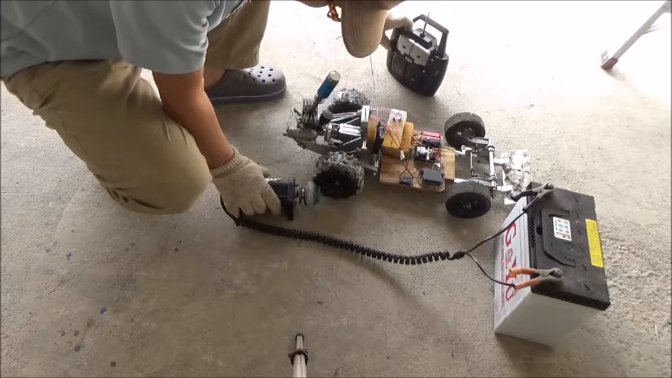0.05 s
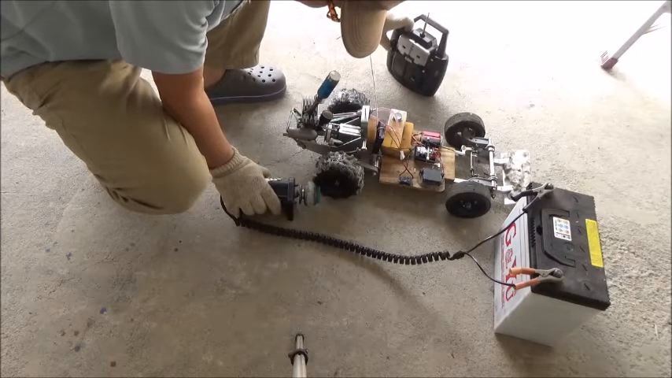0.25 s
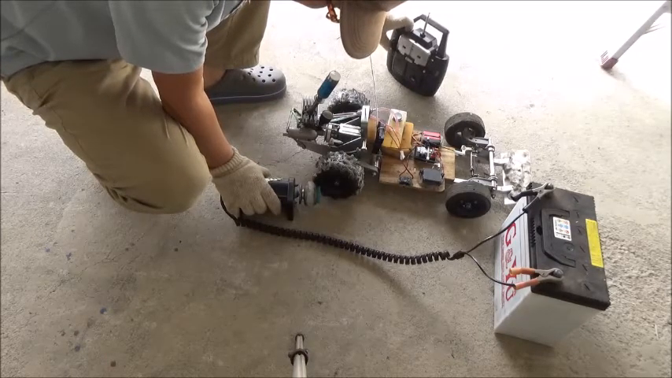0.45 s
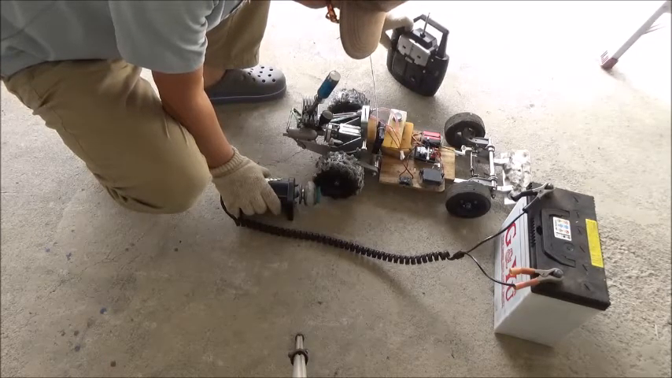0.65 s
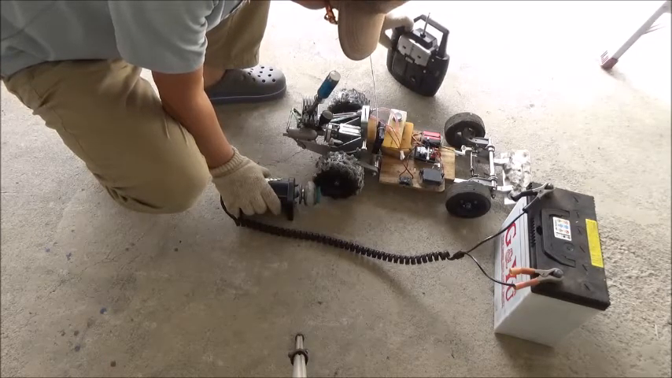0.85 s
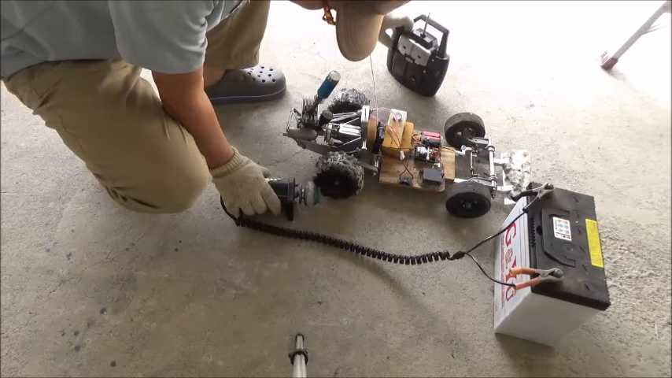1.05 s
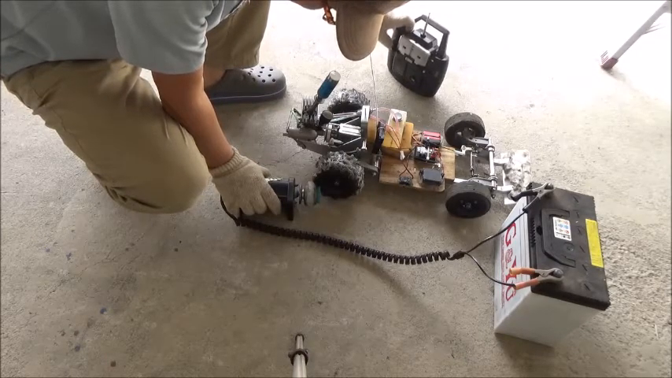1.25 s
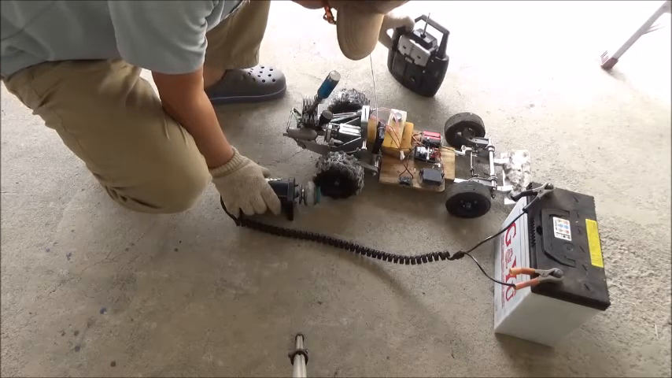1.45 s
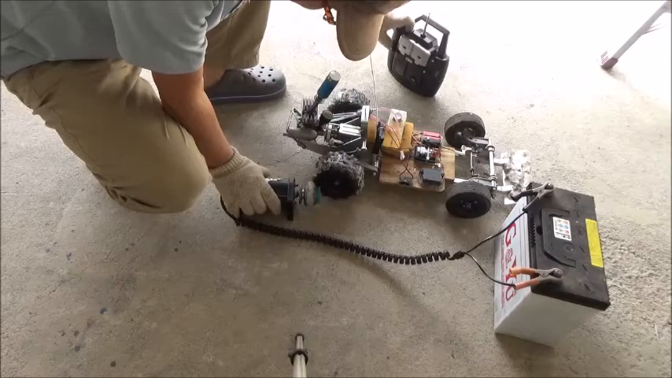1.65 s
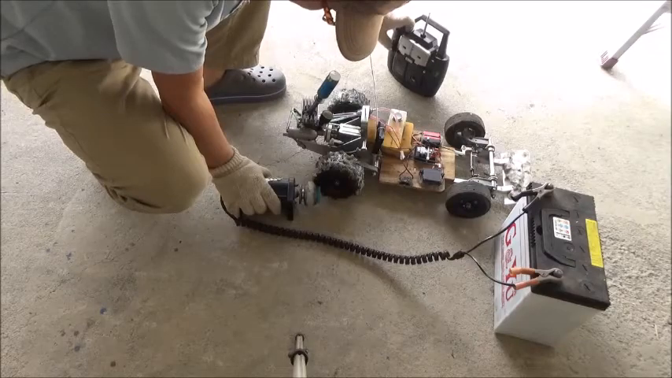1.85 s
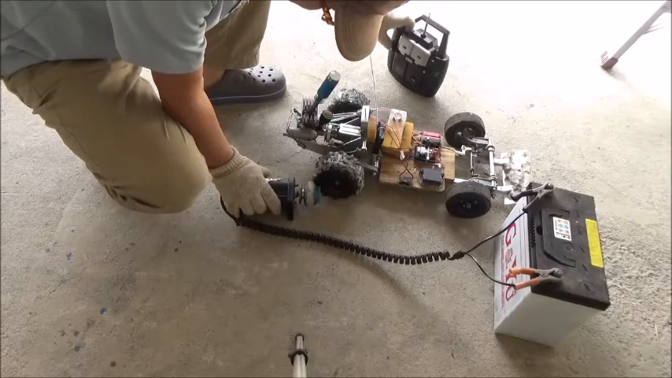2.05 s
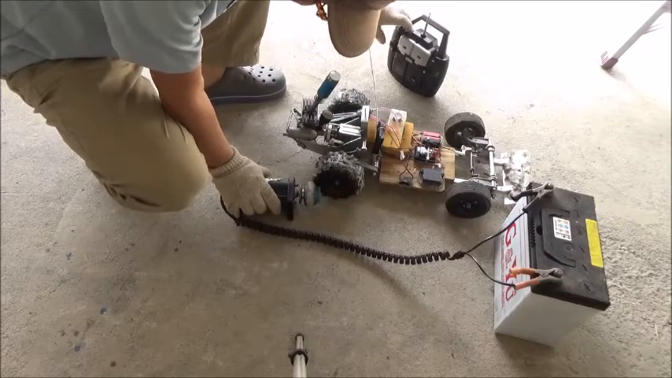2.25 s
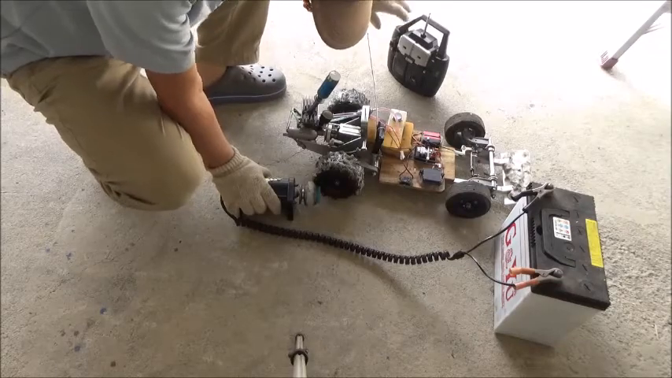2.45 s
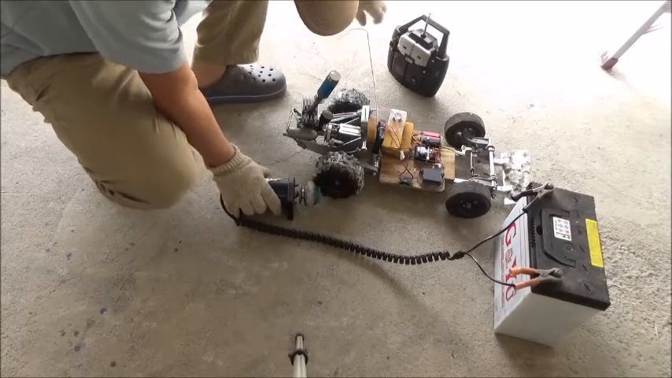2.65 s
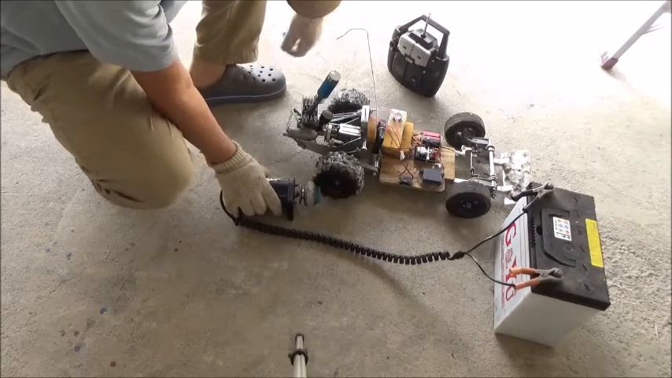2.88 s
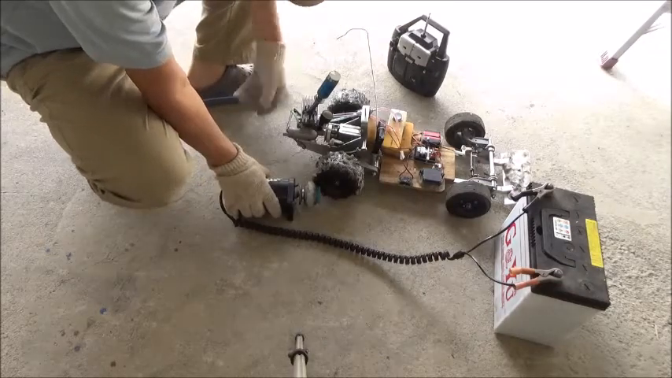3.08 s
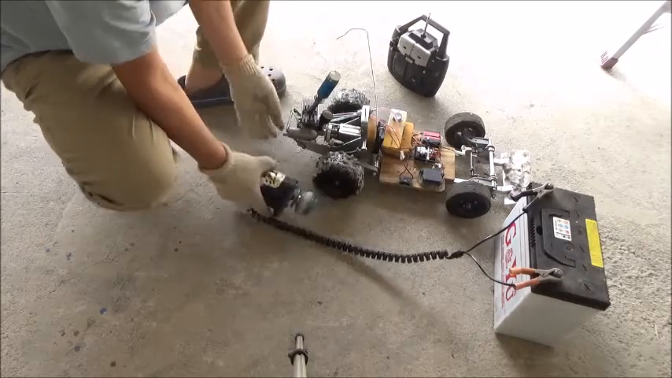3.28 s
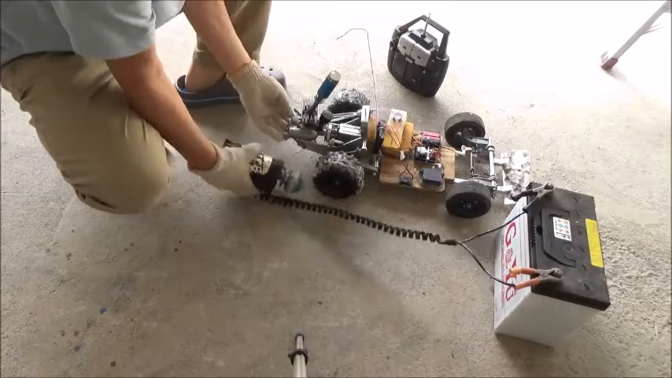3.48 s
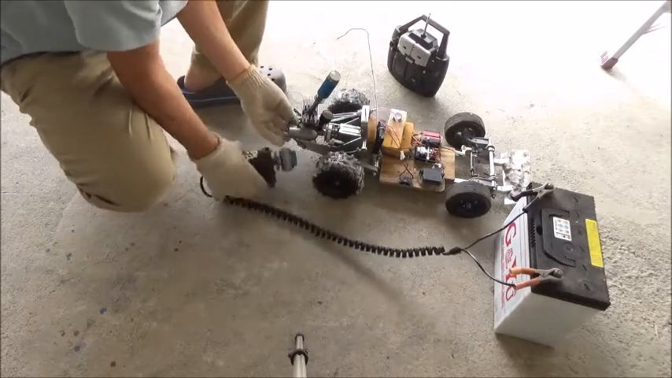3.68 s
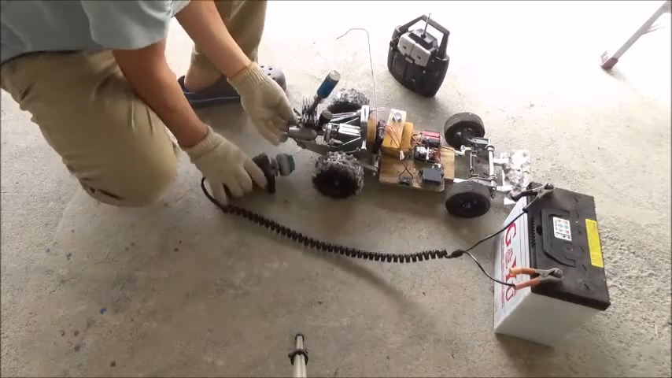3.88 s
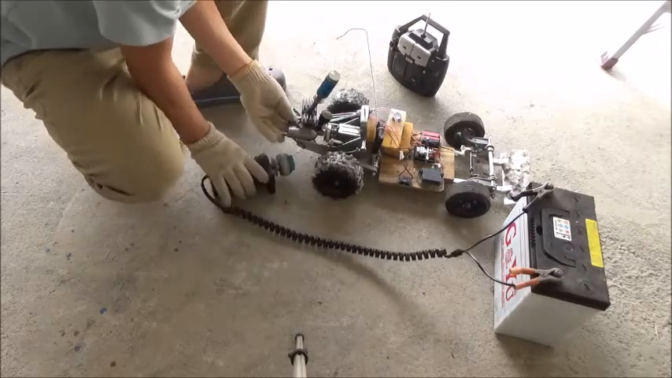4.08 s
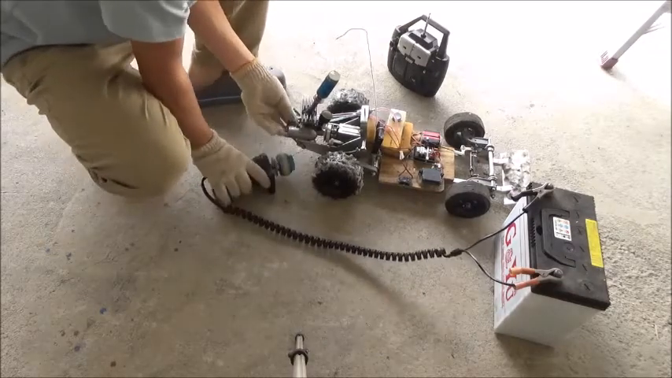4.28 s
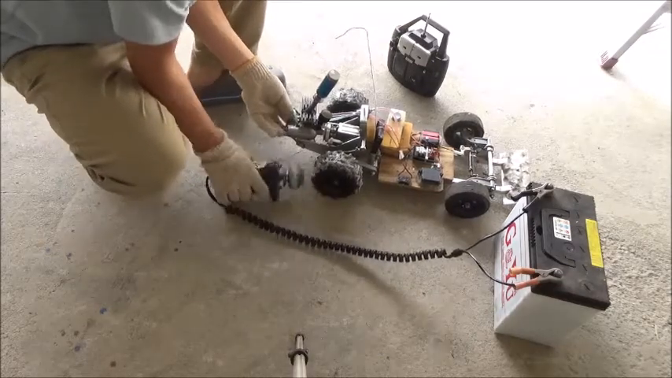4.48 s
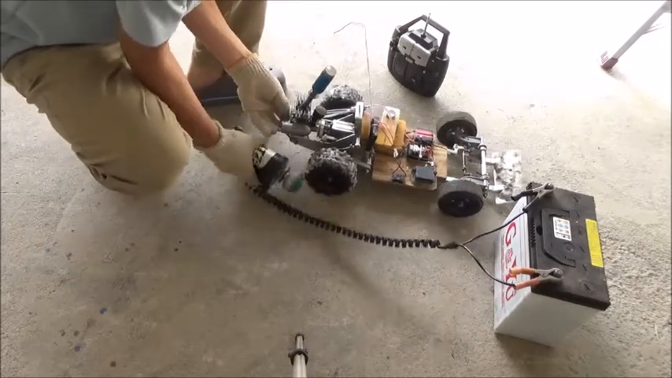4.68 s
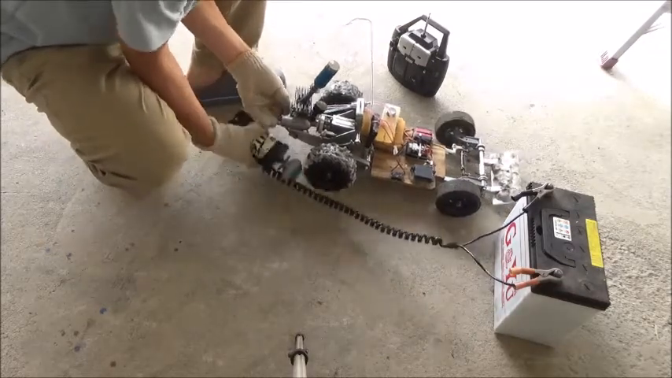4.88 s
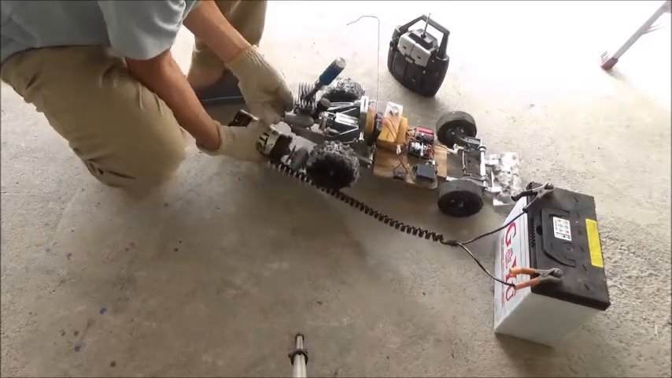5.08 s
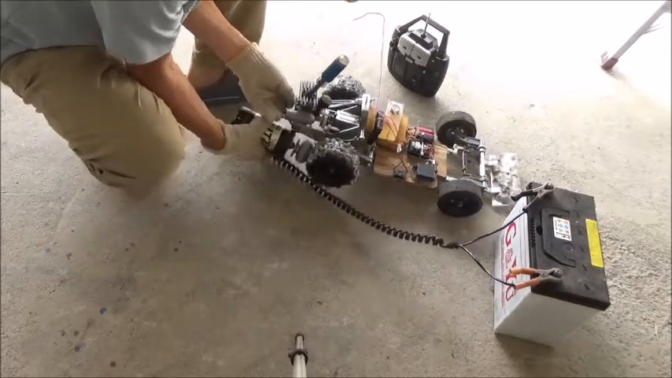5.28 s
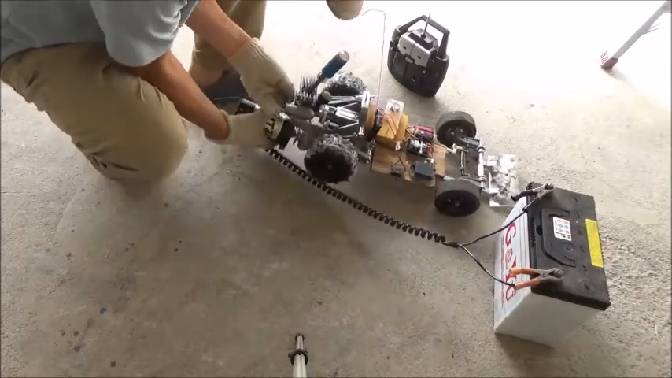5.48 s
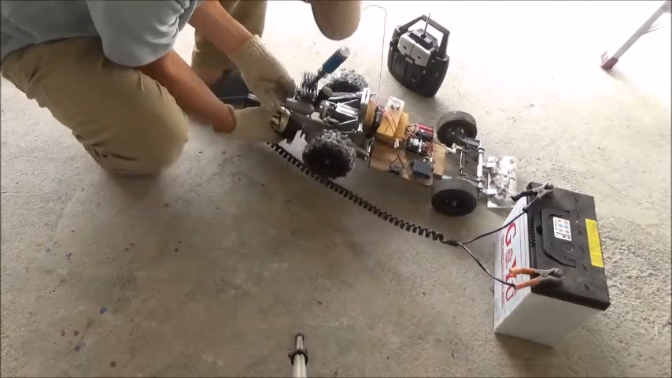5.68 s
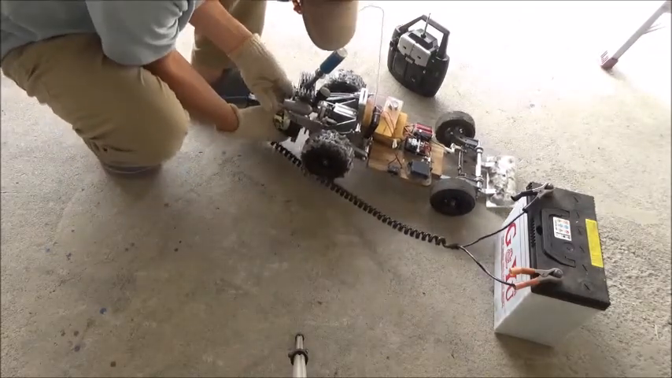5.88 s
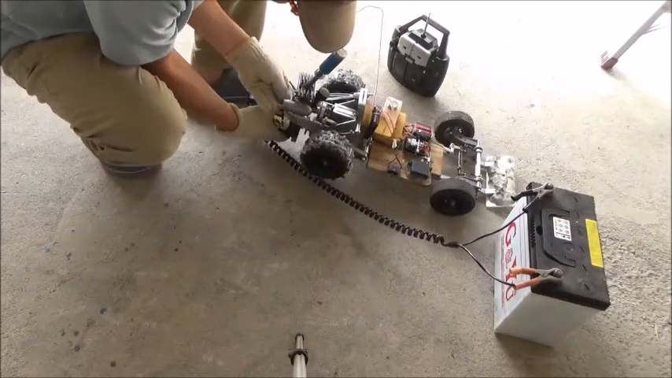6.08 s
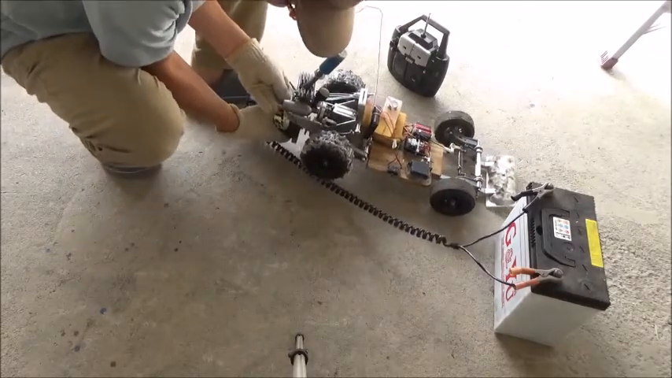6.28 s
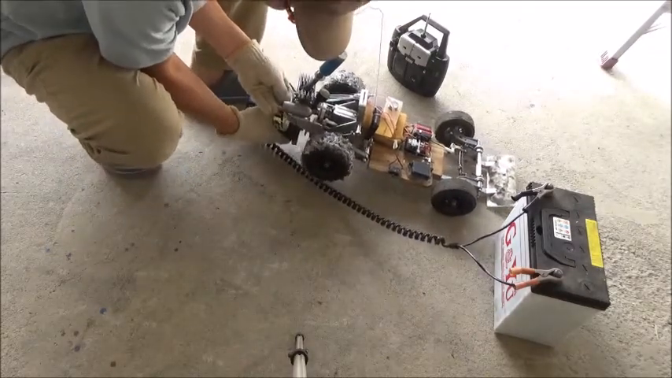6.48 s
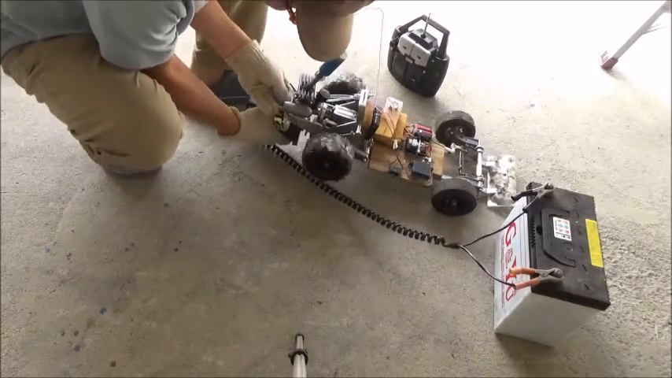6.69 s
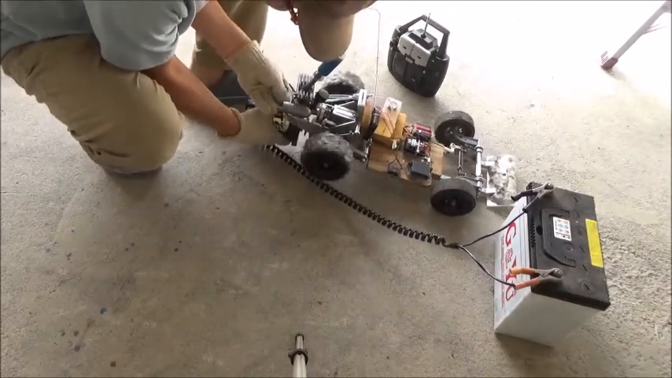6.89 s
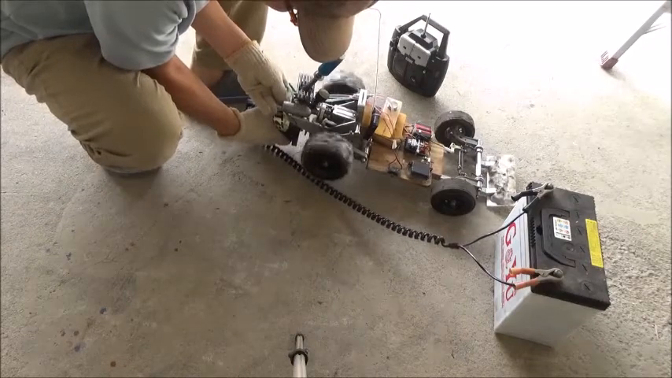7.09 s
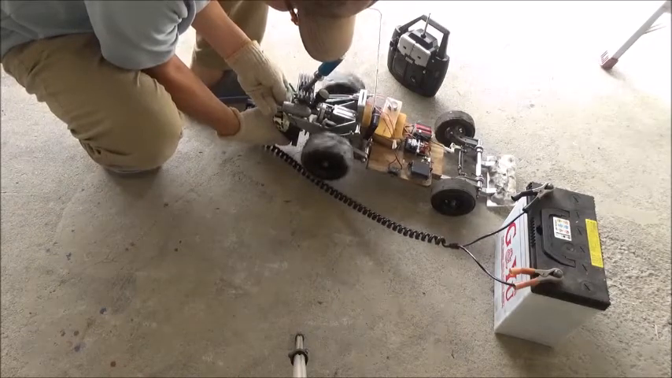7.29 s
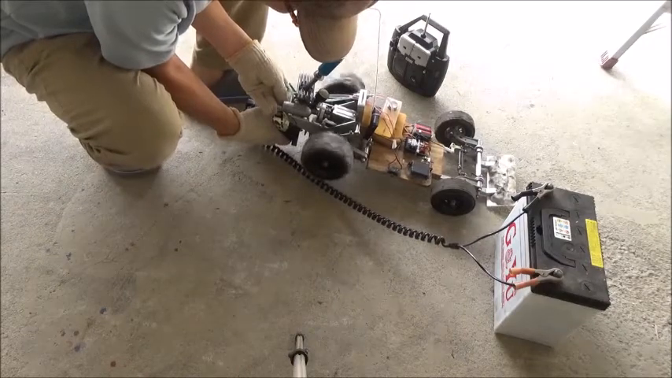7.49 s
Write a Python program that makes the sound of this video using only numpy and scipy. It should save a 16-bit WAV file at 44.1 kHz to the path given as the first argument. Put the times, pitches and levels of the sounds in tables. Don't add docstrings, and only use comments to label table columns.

```python
import sys
import numpy as np
from scipy import signal
from scipy.fft import rfft, irfft
from scipy.io import wavfile
from scipy.ndimage import uniform_filter1d

SR = 44100
rng = np.random.default_rng(int(sys.argv[2]) if len(sys.argv) > 2 else 0)


def elevation(decibels):
    levels = np.asarray(decibels, float)
    return 10 ** (levels / 20)


def wrap_up_sound(samples):
    columns = np.atleast_2d(samples).T
    tamed = np.clip(columns, -1, 1)
    steps = np.round(tamed * 32767).astype(np.int16)
    wavfile.write(sys.argv[1], SR, steps)


N = 332514


def evened(x):
    return x / np.sqrt(np.mean(x ** 2) + 1e-20)


def read(points, hz):
    f, value = np.transpose(points)
    return np.interp(np.log(hz + 1), np.log(f + 1), value)


def add(mix, start_s, sound):
    part = mix[round(start_s * SR):][:len(sound)]
    part += sound[:len(part)]


def resonate(x, hz, width_hz):
    turn = np.exp(2j * np.pi * np.cumsum(hz * np.ones(len(x))) / SR)
    r = np.exp(-np.pi * width_hz / SR)
    return 2 * (turn * signal.lfilter([1 - r], [1, -r], x / turn + 1e-18)).real


def resonate_twice(x, hz, width_hz, ratio):
    return resonate(resonate(x, hz, width_hz), hz, ratio * width_hz)


def coloured(x, points):
    size = x.shape[-1]
    return irfft(rfft(x) * elevation(read(points, np.fft.rfftfreq(size, 1 / SR))), size)


def thinned(x, hz):
    return signal.sosfilt(signal.butter(3, hz, "high", fs=SR, output="sos"), x)


def drift(size, hz):
    low_pass = signal.butter(2, hz, fs=SR, output="sos")
    return evened(signal.sosfiltfilt(low_pass, rng.standard_normal(size)))


def grit(size, per_s, spread_db):
    sizes = elevation(spread_db * np.minimum(rng.exponential(1, size), 3))
    return evened(rng.standard_normal(size) * (rng.random(size) < per_s / SR) * sizes)


# centre in Hz, width in Hz, level in dB.
FAN_HUM = [(117.6, 15, -84.5), (244, 12.5, -74.5)]


def fan():
    return sum(elevation(db) * evened(resonate_twice(rng.standard_normal(N), hz, width_hz, 2))
               for hz, width_hz, db in FAN_HUM)


# frequency in Hz, density in dB per Hz.
CHORUS_SPECTRUM = [(15, -64), (25, -31), (188, -16.5), (248, -5.5), (373, -8.5), (482, -3), (782, -1.5),
                   (1150, -9.5), (2010, 2), (3180, -2.5), (3710, 1.5), (4910, 1.5), (6840, 2.5), (9770, -4),
                   (11100, -9), (14400, -43), (22000, -120)]
# frequency in Hz, correlation (-1 to 1).
CHORUS_LIKENESS = [(25, 0.99), (170, 0.92), (490, 0.73), (1400, 0.68), (4010, 0.77), (11500, 0.74)]
# centre in seconds, half length in seconds, change in dB.
INSECT_LULLS = [
    (0.05, 0.55, -2.5),
    (1.58, 0.25, -2),
    (2.85, 0.17, -2),
    (6.014, 0.038, -3.5),
]


def chorus():
    frames, hz = N // 256 + 5, np.fft.rfftfreq(1024, 1 / SR)
    a, b, c, d, patches = rng.standard_normal((frames, 513, 5)).T
    patches = evened(uniform_filter1d(uniform_filter1d(patches, 10, 0), 14, 1))
    same = np.clip(read(CHORUS_LIKENESS, hz), -1, 1)[:, None]
    left = a + 1j * b
    right = same * left + np.sqrt(1 - same ** 2) * (c + 1j * d)
    z = np.array([left, right])
    z *= elevation(read(CHORUS_SPECTRUM, hz)[:, None] + 2.36 * patches)
    frame_s = np.arange(frames) * 256 / SR
    lull_db = sum(db * np.exp(-((frame_s - s) / half_s) ** 2) for s, half_s, db in INSECT_LULLS)
    z *= elevation(np.outer(np.clip(hz / 2500, 0, 1), lull_db))
    air = signal.istft(z, nperseg=1024, noverlap=768)[1][:, :N]
    return elevation(-44.5) * elevation(0.3 * drift(N, 0.87)) * evened(air)


# start in seconds, end in seconds, level in dB.
BUZZES = [
    (2.273, 2.598, -45.5),
    (3.359, 3.701, -44),
    (4.446, 4.801, -45.5),
    (5.556, 5.915, -45),
]
# resonance in Hz, width in Hz, level in dB.
ABDOMEN_MODES = [(3500, 38, 0.5), (4510, 41, 0.5), (5250, 120, 1), (5710, 90, 2.5), (6260, 33, -23),
                 (6500, 55, 0)]


def buzz():
    out = np.zeros(N)
    spectrum = [(2000, -31), (3500, 1.5), (5500, -9), (7200, 6.0), (7800, -28), (11000, -40)]  # Hz, dB
    for start_s, end_s, db in BUZZES:
        clicks = grit(round((end_s - start_s) * SR), 4000, 0.73)
        wide = coloured(clicks, spectrum)
        bands = sum(elevation(d) * resonate(clicks, hz, max(width_hz, 120)) for hz, width_hz, d in ABDOMEN_MODES)
        body = evened(evened(wide) + 1.5 * evened(bands))
        add(out, start_s, elevation(db) * body * signal.windows.tukey(len(clicks), .35))
    return out


# start in seconds, length in seconds, top in Hz, level in dB.
CHIRPS = [(0.084, .05, 2010, -58), (0.182, 0.034, 2220, -51.5), (0.342, 0.13, 1660, -52),
          (0.441, .12, 2540, -47.5), (0.642, 0.065, 2540, -54), (0.708, 0.18, 2360, -51.5),
          (1.211, 0.11, 2600, -48.5), (1.662, 0.046, 1790, -56), (1.77, 0.038, 2600, -53),
          (1.865, 0.052, 2740, -53.5), (1.961, 0.028, 2440, -49), (2.029, 0.088, 2680, -47.5),
          (2.885, 0.054, 2384, -54), (2.967, 0.067, 2330, -55), (3.059, .04, 2520, -50),
          (3.203, 0.17, 2165, -50.5), (4.101, 0.11, 1920, -50), (4.738, 0.061, 3580, -47),
          (4.798, 0.11, 2610, -52), (5.053, 0.058, 2270, -60), (5.221, 0.083, 2420, -51)]
# start in seconds, length in seconds, pitch in Hz, level in dB.
HELD_NOTES = [(.37, 0.12, 2880, -53), (.42, 0.1, 3500, -51), (0.562, 0.65, 3570, -51),
              (0.855, 0.35, 1805, -53.5), (1.348, 0.13, 3660, -49), (1.982, 0.066, 1650, -53),
              (2.106, 0.141, 3500, -46), (2.401, 0.23, 1984, -52), (3.028, 0.11, 1325, -57),
              (3.155, 0.165, 3645, -45), (3.933, 0.313, 1920, -50), (4.114, 0.091, 3500, -48.5),
              (4.227, 0.24, 3694, -46), (5.032, 0.42, 3630, -53), (5.327, 0.26, 3626, -48.5),
              (5.381, 0.41, 1890, -51)]
# start in seconds, length in seconds, first pitch in Hz, level in dB.
FALLS = [
    (2.215, 0.071, 3290, -46),
    (3.35, 0.0485, 2130, -46),
]
# start in seconds, length in seconds, first Hz, last Hz, level in dB.
RASPS = [
    (0.382, 0.19, 4500, 6030, -47.5),
    (0.497, 0.21, 9600, 10100, -51.5),
    (0.55, 0.37, 6500, 6840, -49.5),
    (0.699, 0.24, 6900, 9100, -54),
    (0.9, 0.31, 9800, 10000, -63),
    (1.118, 0.23, 4000, 4320, -47.5),
    (1.228, 0.16, 4500, 8300, -60),
    (1.949, 0.48, 6140, 7600, -43.5),
    (4.097, 0.2, 3970, 7250, -44),
    (4.9, 0.23, 7500, 7500, -53),
]
# start in seconds, level in dB.
CLIMBS = [
    (1.23, -46),
    (3.109, -43.5),
    (4.189, -45),
    (5.28, -45.5),
]
# delay in seconds, length in seconds, first Hz, last Hz, width in Hz, dB.
CLIMB_STEPS = [
    (0, 0.18, 7400, 8260, 1100, 1),
    (0.064, 0.27, 9100, 9200, 1800, -2.5),
]
BUZZ_HUM_HZ = [1560, 1500, 1500, 1600]


def songs():
    whistles = [(s, n, 1424, top_hz, 200, db) for s, n, top_hz, db in CHIRPS]
    whistles += [(s, n, hz, 1.025 * hz, 144 + 0.016 * hz, db) for s, n, hz, db in HELD_NOTES]
    whistles += [(s, n, hz, 1560, 200, db) for s, n, hz, db in FALLS]
    rasps = [(s, n, first_hz, last_hz, 1750, db) for s, n, first_hz, last_hz, db in RASPS]
    for s, db in CLIMBS:
        for delay_s, n, first_hz, last_hz, width_hz, step_db in CLIMB_STEPS:
            rasps.append((s + delay_s, n, first_hz, last_hz, width_hz, db + step_db))
    for (s, end_s, db), hz in zip(BUZZES, BUZZ_HUM_HZ):
        n = end_s - s
        whistles.append((s, n, hz, 1.07 * hz, 200, db - 3.5))
        whistles.append((s + .03, n - .03, 1.92 * hz, 3080, 350, db - 7))
        rasps.append((end_s, 0.24, 10100, 10100, 1800, db - 2.5))
    return whistles, rasps


def tymbal_part(length_s, first_hz, last_hz, width_hz, db, edge, steady):
    size = round(length_s * SR)
    hz = np.linspace(first_hz, last_hz, size) * (1 + .011 * drift(size, 35))
    clicks = grit(size, 1500, 2.0) + 2.0 * rng.standard_normal(size)
    clicks = clicks + steady * np.cos(2 * np.pi * np.cumsum(hz) / SR) * np.sqrt(width_hz / SR)
    voice = evened(resonate_twice(clicks, hz, width_hz, 5.6))
    return elevation(db + 2.5 * drift(size, 30)) * voice * signal.windows.tukey(size, edge)


def cicada():
    sung = np.zeros(N)
    whistles, rasps = songs()
    for parts, edge, steady in (whistles, .3, 3.2), (rasps, .7, 0):
        for start_s, *part in parts:
            add(sung, start_s, tymbal_part(*part, edge, steady))
    return thinned(sung, 1040) + buzz()


# start in seconds, attack in seconds, fade in seconds, low rub in dB, grit in dB.
SCUFFS = [(1.28, 0.08, 0.19, -55.5, -57), (2.522, 0.0095, 0.3, -36.5, -50.5),
          (3.385, 0.038, 0.26, -42.5, -48.5), (3.672, 0.0057, 0.2, -52, -39.5),
          (3.79, 0.0062, 0.18, -42.5, -33.5), (4.43, 0.016, 0.11, -72, -39.5),
          (3.08, 0.053, 0.37, -72, -48.5), (5.16, 0.0044, 0.047, -52, -43.5),
          (5.64, 0.018, 0.17, -67, -50.5), (6.04, 0.026, 0.11, -63, -44),
          (6.335, 0.016, 0.28, -38.5, -31.5), (5.88, 0.014, .07, -53, -51), (3.52, .02, 0.14, -48.5, -59)]
# factor on the sole's resonances, grit centre in Hz.
SCUFF_STROKES = [(0.87, 980), (0.987, 680), (0.796, 820), (0.69, 1120), (0.785, 1600), (1.02, 1850),
                 (1.55, 1540), (1.26, 680), (1.07, 670), (0.97, 1300), (0.817, 850), (1.1, 970),
                 (0.84, 1100)]
# resonance in Hz, width in Hz, level in dB.
SOLE_MODES = [(237, 21, -2), (326.6, 33, 0), (390, 51, -4), (450, 47, -4.5)]


def scuffs():
    out = np.zeros(N)
    for (start_s, attack_s, fade_s, low_db, grit_db), (factor, grit_hz) in zip(SCUFFS, SCUFF_STROKES):
        t = np.arange(0, attack_s + fade_s, 1 / SR)
        rise = elevation(-11 * np.clip(1 - t / attack_s, 0, 1))
        fall = np.clip((t - attack_s) / fade_s, 0, 1) ** 1.53
        slips = grit(len(t), 3000, 1.5)
        low = sum(elevation(d) * resonate_twice(slips, hz * factor, width_hz, 3) for hz, width_hz, d in SOLE_MODES)
        low = evened(thinned(low, 220 * factor))
        high = evened(thinned(resonate(slips, grit_hz, 0.62 * grit_hz), 0.56 * grit_hz))
        sound = elevation(low_db - 28 * fall) * low + elevation(grit_db - 13.5 * fall) * high
        ends = np.minimum(1, np.minimum(t / 0.0019, (t[-1] - t) / (0.14 * fade_s)))
        add(out, start_s, sound * rise * ends)
    return out


# time in seconds, peak in dB, main ring in Hz, t60 in seconds, brightness in dB.
KNOCKS = [(0.523, -30, 1880, 0.04, 5), (1.094, -37, 3270, 0.079, -12), (3.678, -21.5, 1410, 0.042, -1),
          (3.705, -24.5, 980, 0.045, 4), (3.729, -25.5, 1450, .03, 5), (3.756, -29, 1460, .03, 4),
          (3.766, -30, 2840, 0.029, 3), (3.794, -7, 1050, 0.038, -1.5), (3.795, -10.5, 1820, 0.027, -15),
          (3.802, -24, 3000, .03, -3), (3.811, -19, 1095, 0.078, -11), (3.821, -26, 3200, .03, 9),
          (3.848, -21.5, 2950, 0.043, -8), (3.867, -25, 1500, .03, -7), (3.886, -25.5, 1030, .03, -7),
          (3.9, -29, 1090, 0.025, -2), (3.841, -11.5, 1970, 0.024, 0), (4.081, -30, 1560, 0.027, 5),
          (4.41, -30, 3650, 0.033, 0), (4.418, -24, 1720, 0.06, 5), (4.422, -29, 4150, 0.038, 2),
          (4.4255, -27, 3900, 0.037, -6), (4.47, -27, 1500, 0.034, 5), (5.16, -27, 715, 0.064, 0),
          (5.164, -34, 2280, .04, 3), (5.454, -54, 3755, 0.04, -4), (5.892, -26.5, 3600, 0.043, 0),
          (6.07, -44, 2880, 0.034, 3), (6.079, -21.5, 1980, 0.024, 5), (6.1, -24, 2970, 0.027, -2),
          (6.155, -23, 3500, 0.049, 0), (6.346, -14.5, 2550, 0.032, -1)]
# mode in Hz, level in dB, t60 in seconds.
TOOL_MODES = [(851, 0, 0.053), (2961, 0, 0.033), (4700, -9, 0.014), (5238, -8, 0.011), (5642, -33, 5.0),
              (6708, -5, 0.01), (7445, -23, 0.044), (8172, -27, 5.0)]
# frequency in Hz, level in dB.
CRACK_SPECTRUM = [(150, -33), (400, -12), (1000, 1.5), (3000, 1), (5000, -6), (10000, -16)]


def knocks():
    out, t = np.zeros(N), np.arange(4000) / SR
    detunes = rng.uniform(.92, 1.08, (len(KNOCKS), len(TOOL_MODES)))
    for (s, db, hz, t60_s, bright_db), detune in zip(KNOCKS, detunes):
        body = sum(elevation(d - 60 * t / min(.035, ring_s)) * np.sin(2 * np.pi * f * q * t)
                   for (f, d, ring_s), q in zip(TOOL_MODES, detune))
        main = elevation(-60 * t / t60_s) * np.sin(2 * np.pi * hz * t)
        noise = evened(coloured(rng.standard_normal(len(t)), CRACK_SPECTRUM))
        crack = elevation(bright_db - 60 * t / (0.79 * t60_s)) * noise
        tick = elevation(bright_db - 8 - 60 * t / 0.0049) * rng.standard_normal(len(t))
        sound = (main + 0.34 * body + crack + tick) * np.minimum(t / 0.00091, 1)
        add(out, s, elevation(db) * sound / abs(sound).max())
    out = thinned(out, 280)
    thud = elevation(-55 - 60 * t / .2) * np.sin(2 * np.pi * 70 * t)
    add(out, 3.795, thud)
    return out


TRIGGER_S, SPINS_AT_S, RISE_S, LOADED_AT_S, BITE_S = 6.07, 6.14, 0.056, 6.345, .11
RING_ORDER, LOWER_ORDER = 9, 8
# time in seconds, ninth order in Hz, effort in dB, case ring in dB, lower ring in dB.
CRANKING = [(6.399, 851, -23, -1, 0), (6.46, 853.4, -22.5, 0, -5), (6.505, 842.7, -26, -5, 5),
            (6.54, 867.7, -23, 1, 1), (6.601, 861.6, -28.5, 1, -4), (6.635, 867, -25, 4.5, 3),
            (6.7, 861.5, -26.5, 0, -4), (6.765, 856, -24.5, 0, -5), (6.814, 832.7, -23.5, 1, 6),
            (6.878, 857.2, -26, 1, -2), (7.051, 857.8, -25, 3.5, -4), (7.091, 865.2, -23, 2, 2),
            (7.309, 866, -24, 1, -0.5), (7.4, 863, -24.5, -2, 2.5), (7.44, 866, -29.5, -2, -4),
            (7.51, 861, -26.5, -4, -2), (7.54, 852, -25.5, 3, 3)]


def shaft_turns(t, bite):
    s, ninth_hz = np.transpose(CRANKING)[:2]
    free_ninth_hz = 821
    speed_hz = (free_ninth_hz + bite ** 2 * (np.interp(t, s, ninth_hz) - free_ninth_hz)) / 9
    speed_hz = speed_hz * (1 - .008 * np.exp(-np.maximum(t - SPINS_AT_S, 0) / .04))
    speed_hz = speed_hz * (1 - .07 * np.sin(np.pi * bite) ** 2)
    return np.cumsum(speed_hz * (1 + .004 * drift(len(t), 14))) / SR


IDLE_DB = [-45, -45, -44.5]
FREE_DB = [-34.5, -47, -26]
LOADED_DB = [-24, -24, -22]
FREE_SAG_DB = [0.5, 6, 4]
EFFORT_SHARE = [1., 0.4, 0.036]


def layer_levels_db(t, bite):
    s, _, effort_db, _, _ = np.transpose(CRANKING)
    effort = np.interp(t, s, effort_db - np.mean(effort_db))
    spun = np.clip((t - SPINS_AT_S) / RISE_S, 0, 1)
    full_s = SPINS_AT_S + RISE_S
    sag = np.sin(np.pi * np.clip((t - full_s) / (LOADED_AT_S - full_s), 0, 1))
    layers = zip(IDLE_DB, FREE_DB, LOADED_DB, EFFORT_SHARE, FREE_SAG_DB)
    drone_db, ring_db, hiss_db = (
        idle + spun * (free - idle) - sag_db * sag + bite * (loaded - free + share * effort)
        for idle, free, loaded, share, sag_db in layers)
    return drone_db, ring_db + 4 * np.sin(np.pi * bite), hiss_db


# multiple of the crank speed, level in dB.
CRANK_ORDERS = [(1, -38), (2, -32), (3, -28), (4, -11), (5, -17), (6, -13), (7, -8), (8, -5), (9, -1),
                (10, -5), (11, -7), (12, -9), (13, -6), (14, -11), (15, -10), (16, -12), (17, -11),
                (18, -9), (19, -15), (20, -16), (21, -14), (22, -15), (23, -14), (24, -14), (25, -16),
                (26, -17), (27, -17), (28, -10), (29, -7), (34, -10), (35, -15)]
# multiple of the crank speed, level in dB.
FREE_ORDERS = [(1, -47), (2, -33), (3, -35), (4, -26), (5, -20), (6, -21), (7, -7), (8, 0), (9, -12),
               (10, -8), (11, -6), (12, -8), (13, -8), (14, -6), (15, -6), (16, -5), (17, -13), (18, -3)]


def crank_drone(t, turns, load):
    s, _, _, case_db, lower_db = np.transpose(CRANKING)
    free_orders = dict(FREE_ORDERS)
    drone = np.zeros(len(t))
    for k, db in CRANK_ORDERS:
        case = np.interp(t, s, case_db * (k == RING_ORDER) + lower_db * (k == LOWER_ORDER))
        level_db = load * (db + case) + (1 - load) * free_orders.get(k, -40)
        level_db = level_db + (1.0 + 2.3 * load) * drift(len(t), 25)
        slide = 7.1 / (1 + np.exp((k - 7.1) / .55))
        smear = .03 * (1 - load) * k ** 2
        drone += elevation(level_db) * np.cos(2 * np.pi * k * turns + slide + smear)
    drone = drone / np.sqrt(np.mean(drone[load > 0] ** 2))
    return drone * elevation(2.5 * (1 - load)) * np.clip((t - 6.163) / 0.015, 0, 1)


# multiple of the motor shaft speed, level in dB.
MOTOR_ORDERS = [(1, -68), (1.5, -63), (2, -61), (3, -45), (8, -50), (39.4, -42)]


def motor_whine(turns):
    return sum(elevation(db + 3.2 * drift(len(turns), 4.8)) * np.cos(2 * np.pi * k * 1.745 * turns)
               for k, db in MOTOR_ORDERS)


GEAR_GUSTS = [
    (.8, .06, .65),
    (.92, .05, .6),
    (.33, .08, .3),
]


def gear_rattle(turns):
    gate = .75 + sum(size * np.exp(-(((turns - share + .5) % 1 - .5) / half) ** 2)
                     for share, half, size in GEAR_GUSTS)
    return gate * (rng.standard_normal(len(turns)) + .35 * grit(len(turns), 3000, 2.5))


# share of the turn, level in dB.
HOUSING_BLOWS = [
    (.95, 0),
    (.32, -4),
    (.49, -4),
]
# resonance in Hz, width in Hz, level in dB.
HOUSING_MODES = [(2754, 127, -1), (3020, 220, 1), (3300, 270, -10.5)]


def housing_ring(turns, rattle):
    size = len(turns)
    blows = np.zeros(size)
    for share, db in HOUSING_BLOWS:
        passed = np.floor(turns - share + .012 * drift(size, 150))
        blows += elevation(db) * (np.diff(passed, prepend=0) > 0)
    blows = blows * elevation(2.5 * rng.standard_normal(size))
    drive = evened(blows) + .28 * evened(rattle)
    return evened(sum(elevation(db) * resonate_twice(drive, hz, width_hz, 3) for hz, width_hz, db in HOUSING_MODES))


# frequency in Hz, density in dB per Hz.
GEAR_SPECTRUM = [(88, -64), (150, -35), (325, -29), (600, -19.5), (860, -13), (1300, -10), (2160, -8.5),
                 (3040, -7), (4430, -9), (6470, -8), (9610, -8), (11100, -9), (14400, -47)]
# centre in Hz, width in Hz, level in dB.
LOADED_PEAKS = [(5000, 170, -34), (6300, 230, -2), (8420, 130, -1.5), (9590, 110, 0)]
# centre in Hz, width in Hz, level in dB.
FREE_PEAKS = [(1720, 190, -5), (6000, 110, 8), (6900, 190, -2), (10200, 550, 4.5), (10700, 180, -2)]


def gear_hiss(t, rattle):
    seated = np.clip((t - LOADED_AT_S - .05) / 0.042, 0, 1)
    loaded, free = (sum(elevation(db) * resonate(rattle, hz, width_hz) for hz, width_hz, db in modes)
                    for modes in (LOADED_PEAKS, FREE_PEAKS))
    return evened(coloured(rattle + seated * loaded + (1 - seated) * free, GEAR_SPECTRUM))


# start in seconds, length in seconds, first Hz, last Hz, level in dB.
SQUEAKS = [
    (6.112, 0.033, 2820, 3200, -38),
    (6.122, 0.029, 1395, 1560, -37.5),
]


def squeaks():
    out = np.zeros(N)
    for start_s, length_s, first_hz, last_hz, db in SQUEAKS:
        hz = np.linspace(first_hz, last_hz, round(length_s * SR))
        tone = np.sin(2 * np.pi * np.cumsum(hz) / SR) * np.hanning(len(hz)) ** .5
        add(out, start_s, elevation(db + 2 * drift(len(hz), 150)) * tone)
    return out


def starter():
    t = np.arange(TRIGGER_S, N / SR, 1 / SR)
    bite = np.clip((t - LOADED_AT_S) / BITE_S, 0, 1)
    load = np.clip((t - LOADED_AT_S) / 0.052, 0, 1)
    turns = shaft_turns(t, bite)
    drone_db, ring_db, hiss_db = layer_levels_db(t, bite)
    rattle = gear_rattle(turns)
    shake_spectrum = [(20, -50), (150, -32), (280, -8), (430, 5), (600, -8), (1000, -50)]  # Hz, dB
    shake = elevation(-55.5) * evened(coloured(rattle, shake_spectrum))
    drone = elevation(drone_db - 1.17) * crank_drone(t, turns, load)
    ring = elevation(ring_db - 1.5) * housing_ring(turns, rattle)
    hiss = elevation(hiss_db + 2.5) * gear_hiss(t, rattle)
    out = np.array([np.zeros(N), squeaks()])
    add(out[0], TRIGGER_S, drone + load * (shake + motor_whine(turns)))
    add(out[1], TRIGGER_S, ring + hiss)
    return out


# frequency in Hz, t60 in seconds.
PORCH_T60 = [(200, 0.22), (1000, 0.54), (4000, 0.22), (10000, 0.15)]


def porch(x):
    taps = np.zeros((2, SR // 2))
    at = np.arange(200, SR // 2 - 20, 20) + rng.integers(0, 20, (2, (SR // 2 - 201) // 20))
    np.put_along_axis(taps, at, rng.choice([-1., 1.], at.shape), 1)
    hz, t, z = signal.stft(taps, SR, nperseg=256)
    tail = signal.istft(z * elevation(-60 * t / read(PORCH_T60, hz)[:, None]), SR, nperseg=256)[1]
    return signal.fftconvolve(x[None], tail / np.linalg.norm(tail[0]), axes=1)[:, :N]


def scene():
    background = fan() + chorus()
    insect = cicada()
    hands = knocks() + scuffs()
    drone, clatter = starter()
    send = elevation(-14) * drone + elevation(-9.0) * clatter + elevation(-6.0) * insect + elevation(-10.0) * hands
    return drone + clatter + insect + hands + porch(thinned(send, 310)) + background


def top_cut(x):
    return signal.sosfilt(signal.butter(12, 11180, fs=SR, output="sos"), x)


# frequency in Hz, left-right difference in dB.
MIC_LEAN = [(60, -0.15), (170, -0.11), (490, -0.29), (1400, -0.27), (4010, -1.85), (11500, 0.1)]


def record(dry):
    lean_db = read(MIC_LEAN, np.fft.rfftfreq(N, 1 / SR))
    leaned = irfft(rfft(dry) * elevation(np.outer([.5, -.5], lean_db)), N)
    limited = 1.2 * np.tanh(leaned / 1.2)
    low_pass = signal.firwin(1023, 11030, window=("kaiser", 9), fs=SR)
    mix = signal.oaconvolve(limited, low_pass[None], "same")
    return top_cut(mix)


dry = scene()
out = record(dry)
wrap_up_sound(out)
```